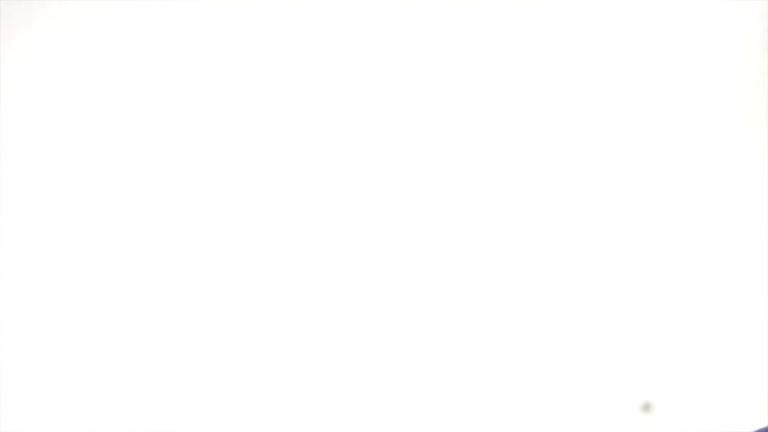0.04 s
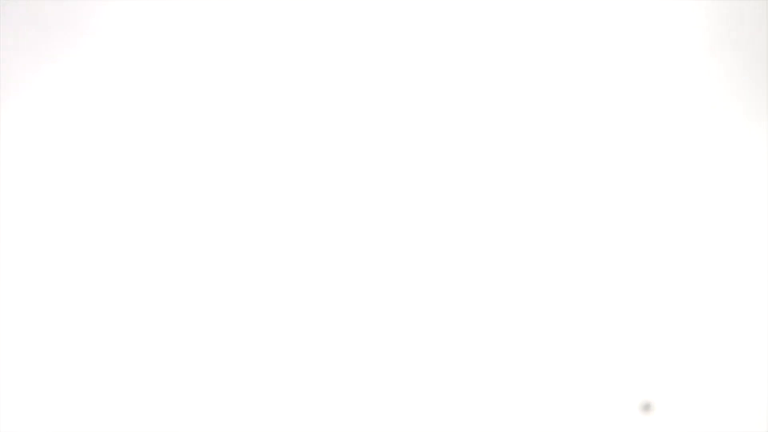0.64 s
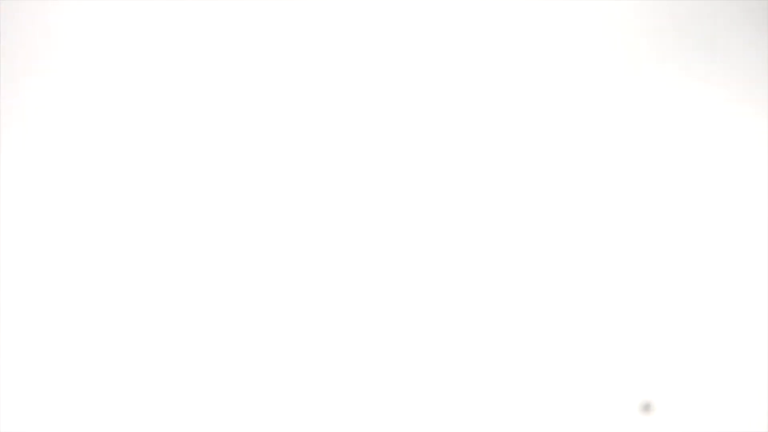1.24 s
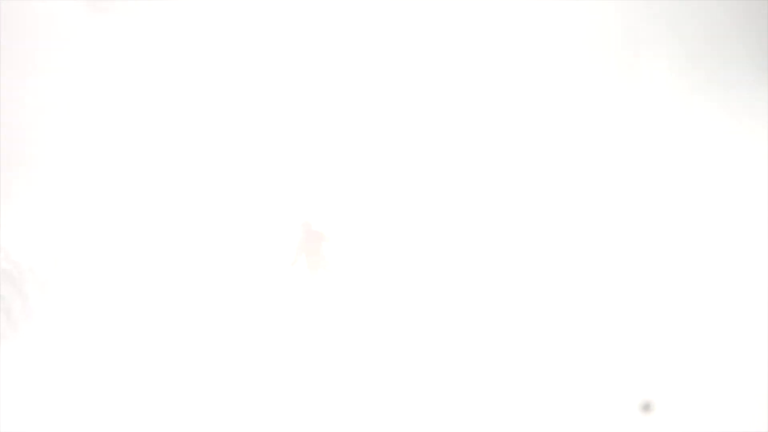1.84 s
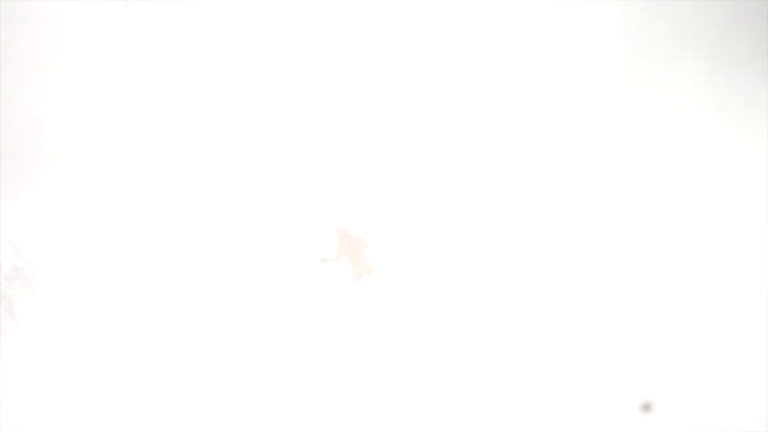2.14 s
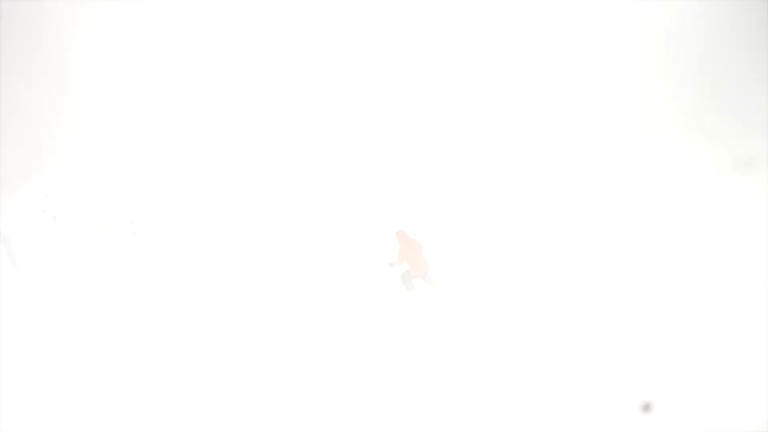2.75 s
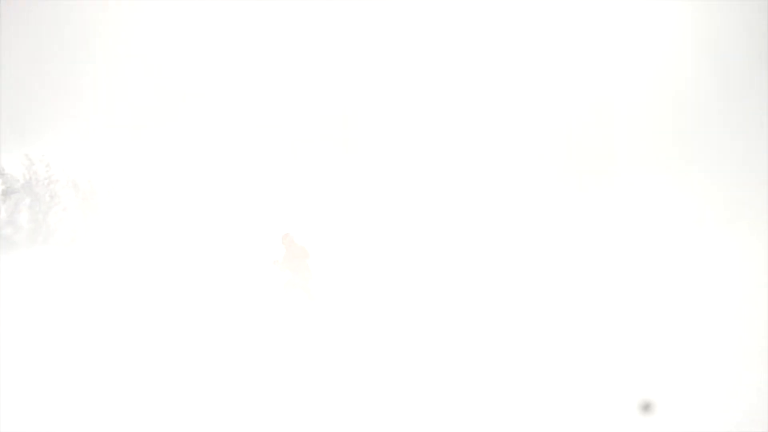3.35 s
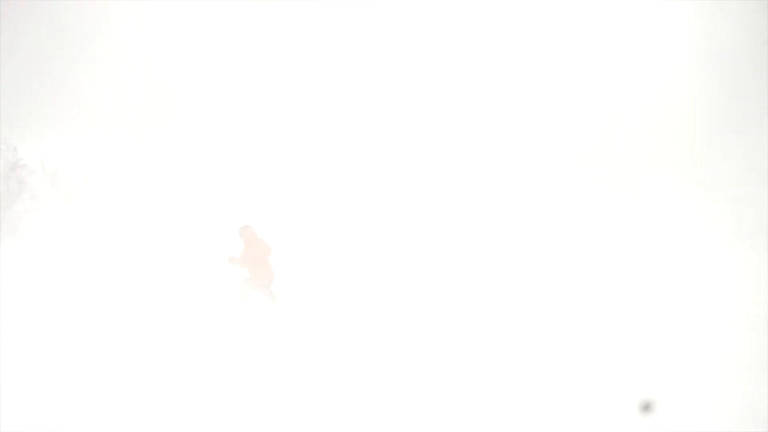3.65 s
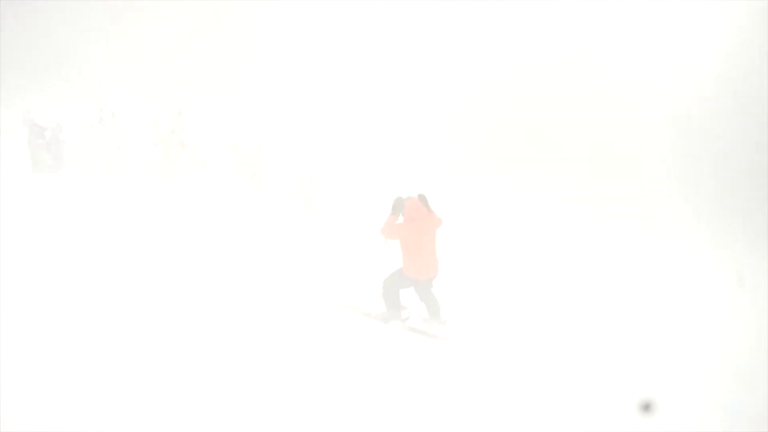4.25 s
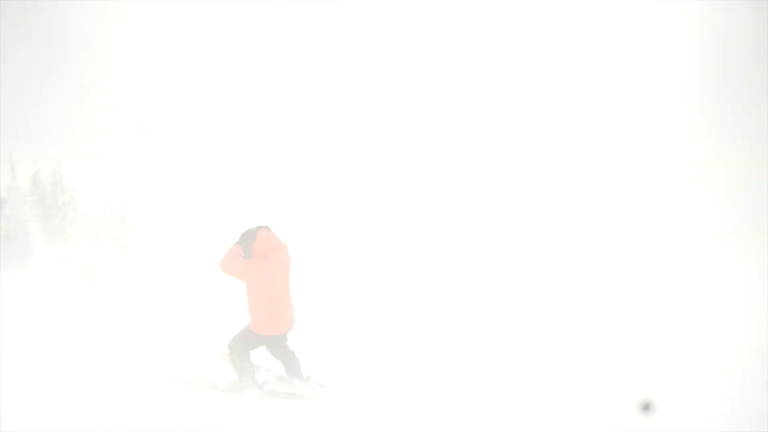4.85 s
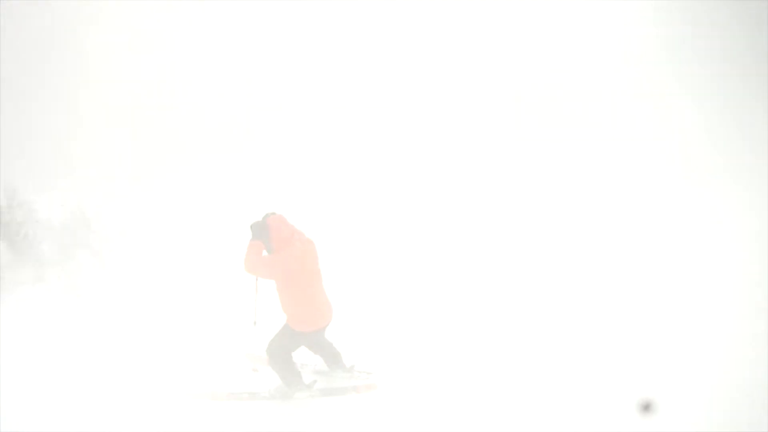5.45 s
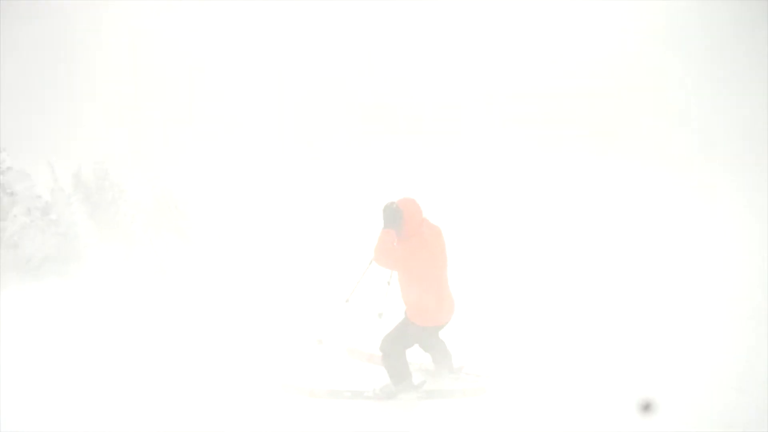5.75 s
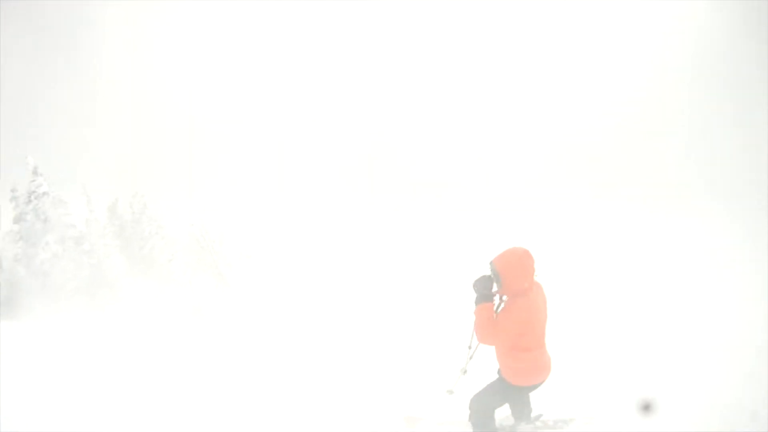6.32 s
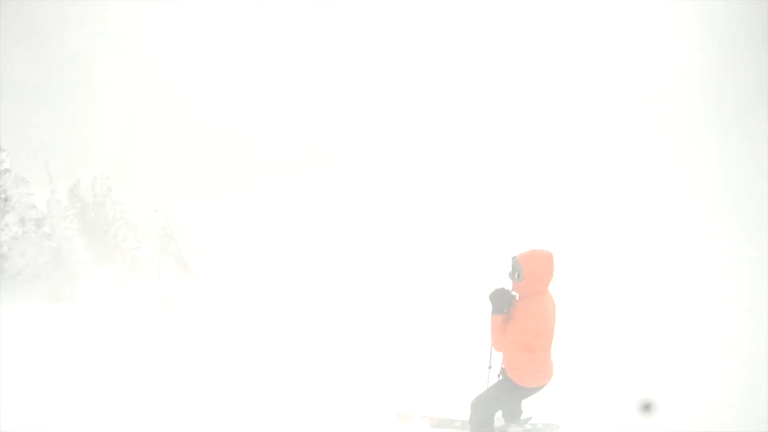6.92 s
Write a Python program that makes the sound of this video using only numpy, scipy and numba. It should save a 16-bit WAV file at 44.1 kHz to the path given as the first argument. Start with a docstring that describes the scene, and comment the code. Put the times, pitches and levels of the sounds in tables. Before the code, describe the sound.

Strong wind beats directly on the microphone of a small camera moving down an open snowy slope. A deep rumble and a hollow flutter run throughout, broken by irregular hard thumps. As gusts swell, the flutter rises in pitch and air rushes past, strongest near the middle, then easing briefly before more gusts arrive. Underneath, skis hiss very faintly on soft snow and a few grains tick against the housing.

```python
"""A snowy slope: strong wind beats on the microphone of a small moving camera.
Large eddies rumble, small ones flutter over the housing; as a gust swells, the flutter rises in pitch
and air rushes across the port, at times tearing into a rasp. Skis hiss faintly and snow grains tick.
Hard buffets crack and duck the gain control; coarse sampling adds a thin fizz high up."""
import sys
import numpy as np
from scipy import signal
from scipy.fft import rfft, irfft
from scipy.io import wavfile
from scipy.ndimage import uniform_filter1d
from numba import njit

SR = 44100
rng = np.random.default_rng(int(sys.argv[2]) if len(sys.argv) > 2 else 0)


def master(y):
    """Save y as 16-bit WAV."""
    cut = np.clip(np.atleast_2d(y).T, -1, 1)
    pcm = np.round(cut * 32767)  # scale
    wavfile.write(sys.argv[1], SR, pcm.astype(np.int16))


N = 316638

# airflow at the port, re usual flow: t/s, level/dB
AIRFLOW = [(0, -1.5), (.4, -4.5), (.56, -17.5), (.67, -1), (.85, -5), (1.19, 3.5), (1.26, -4.5),
           (1.76, -4.5), (1.88, -6.5), (2.01, 5), (2.19, -5.5), (2.85, 9.5), (2.96, 4.5), (3.08, 11),
           (3.22, 3.5), (3.45, 3), (3.87, -5), (4.0, 0.5), (4.25, -9.5), (4.38, -17), (4.5, -14.5),
           (4.68, -14), (5.07, 5), (5.22, 2), (5.34, 5.5), (5.48, 0), (5.6, -12), (5.74, -4), (5.93, -6.5),
           (6.03, -0.5), (6.42, -6), (6.67, 3), (7.05, -10.5), (7.18, 6.5)]
# large eddies: f/Hz, relative density/dB
RUMBLE_SPECTRUM = [(12, -16), (25, -3), (45, 2), (70, 2.5), (110, 0), (160, -8.5), (260, -22), (600, -46)]
# large eddies: t/s, level/dB
RUMBLE_DB = [(0.0, -19), (0.61, -17.5), (2.73, -22), (3.55, -16.5), (3.8, -22.5), (4.14, -18),
             (4.76, -19.5), (7.18, -17.5)]
# small eddies, before the band-pass: f/Hz, relative density/dB
FLUTTER_SPECTRUM = [(70, -4), (140, 4), (220, -1), (320, -2.5), (440, -3), (560, -6), (750, -12),
                    (1400, -34.5)]
# small eddies at usual flow: t/s, level/dB
FLUTTER_DB = [(0.0, -16.5), (0.84, -18.5), (1.48, -13.5), (2.52, -15.5), (2.63, -24), (3.78, -14),
              (3.99, -18), (4.5, -14.5), (4.95, -22.5), (5.13, -17.5), (5.58, -20), (7.18, -21.5)]
# eddy shedding rate of the housing: t/s, f/Hz
SHEDDING_HZ = [(0, 357), (.55, 277), (1.1, 376), (1.4, 204), (2.0, 223), (2.9, 435), (3.9, 278), (4.5, 180),
               (5.25, 423), (5.7, 256), (7.18, 287)]
# air crossing the port: f/Hz, relative density/dB
RUSH_SPECTRUM = [(200, -30), (480, -6.5), (800, 2), (1300, -4.5), (2000, -9), (2300, -13), (2750, -13.5),
                 (3200, -22), (3680, -17.5), (4100, -26), (5000, -34.5), (6000, -40)]
# snow, sliding or ticking: f/Hz, relative density/dB
SNOW_SPECTRUM = [(900, -17.5), (2500, 5), (4000, -0.5), (5000, -3.5), (6000, -13)]
# skis on soft snow: t/s, level/dB
SLIDE_DB = [(0, -48), (.7, -60), (2.2, -45.5), (4.3, -60), (5.5, -56), (6.3, -54), (7.18, -54.5)]
# single eddies hitting the port: t/s, peak level/dB, centre f/Hz
EDDY_HITS = [(0.164, 1, 88), (0.705, -4, 214), (0.744, -5.5, 156), (1.04, -7, 302), (1.206, 1.5, 210),
             (1.783, -2.7, 325), (2.578, -4, 139), (3.043, -12, 444), (3.272, -3, 258), (3.473, -1, 310),
             (4.297, -1.5, 94), (4.396, -2, 122), (4.559, -6, 107), (4.63, 2, 76), (4.704, -0.5, 79.4),
             (4.859, 4, 151), (5.113, -3.5, 228), (5.392, -5, 203), (5.535, -3, 104), (5.737, -5, 86),
             (6.2, -3.5, 106), (6.296, -1.5, 181), (6.384, -2.5, 94), (6.511, -5.8, 131),
             (6.723, -0.5, 112), (6.934, 2.5, 117)]
# snow grains hitting the housing: t/s, level/dB
GRAIN_HITS = [(0.5392, -41.5), (1.5668, -36), (4.4184, -57), (4.6284, -50), (4.7074, -34), (6.133, -44)]
# air tearing at the port: t/s, relative level/dB
FLOW_TEARS = [(0.606, -26), (0.79, -17.5), (1.469, -15), (1.513, -15), (1.708, -18.5), (1.863, -20),
              (4.605, -29), (5.844, -17.5), (6.131, -48)]


def undb(db):
    """Decibels to gain."""
    return 10 ** (np.asarray(db) / 20)


def curve(table):
    """(t/s, value) points at every sample."""
    s, value = np.transpose(table)
    return np.interp(np.arange(N) / SR, s, value)


def noise(spectrum, lo_hz, hi_hz):
    """Shaped noise, rms 1 within the given band."""
    f = np.maximum(np.arange(N // 2 + 1) * SR / N, 1)
    hz, db = np.transpose(spectrum)
    skirts = np.minimum(f / hz[0], 1) ** 2 * np.minimum(hz[-1] / f, 1) ** 2
    gain = undb(np.interp(np.log(f), np.log(hz), db)) * skirts
    power = np.mean(gain ** 2 * (f > lo_hz) * (f < hi_hz))
    return irfft(rfft(rng.standard_normal(N)) * gain, N) / np.sqrt(power)


def smooth(x, hz):
    """Average twice over 1 / hz seconds."""
    k = max(int(SR / hz), 1)
    return uniform_filter1d(uniform_filter1d(x, k), k)


def steady(x, hz):
    """Rms 1 over spans of 1 / hz seconds; faster swings stay."""
    return x / np.sqrt(smooth(x ** 2, hz) + 1e-12)


def flicker(rate_hz, depth_db):
    """Random gain, mean power 1."""
    walk = smooth(rng.standard_normal(N), rate_hz)
    gain = undb(depth_db * walk / walk.std())
    return gain / np.sqrt(np.mean(gain ** 2))


def strikes(events, decay_s):
    """Envelope: a jump and decay per (t/s, level/dB) event."""
    s, db = np.transpose(events)
    onsets = np.clip(s * SR, 0, N - 1).astype(int)
    jumps = np.bincount(onsets, undb(db), N)
    return signal.lfilter([1], [1, -np.exp(-1 / (decay_s * SR))], jumps)


@njit
def resonate(x, hz, width):
    """Moving band-pass; width is bandwidth / centre."""
    y, band, low = np.empty(len(x)), 0., 0.
    for i in range(len(x)):
        g = np.tan(np.pi * hz[i] / SR)
        v = (band + g * (x[i] - low)) / (1 + g * (g + width[i]))
        band, low = 2 * v - band, low + 2 * g * v
        y[i] = width[i] * v
    return y


@njit
def follow(x, attack, release):
    """Envelope of |x|; rates per sample."""
    out, level = np.empty(len(x)), 0.
    for i in range(len(x)):
        level += (abs(x[i]) - level) * (attack if abs(x[i]) > level else release)
        out[i] = level
    return out


def rumble():
    """Large eddies: slow pressure swings."""
    return steady(noise(RUMBLE_SPECTRUM, 20, 150), hz=6.6) * undb(curve(RUMBLE_DB))


def flutter(flow_db, bursts, db_per_flow_db=0.5, narrowing_per_db=0.0537):
    """Small eddies shed by the housing; narrower and more hollow as their base level rises."""
    base_db = curve(FLUTTER_DB)
    width = 2 ** (narrowing_per_db * (base_db.mean() - base_db))
    shed = resonate(noise(FLUTTER_SPECTRUM, 150, 560), curve(SHEDDING_HZ), width)
    return steady(shed * bursts, hz=5.3) * undb(base_db + db_per_flow_db * flow_db)


def rush(flow_db, bursts, eddies, level_db=-31, drag_db=1.4):
    """Air crossing the port, pulled faster by each moment of eddy suction."""
    suction = -2 * np.tanh(steady(eddies, hz=8) / 2)
    air = noise(RUSH_SPECTRUM, 800, 4000) * bursts * undb(drag_db * suction)
    air *= flicker(rate_hz=470, depth_db=0.9)
    return steady(air, hz=22.5) * undb(level_db + flow_db)


def snow(crack_offset_db=-40):
    """Skis hiss unevenly; grains hit the camera singly and with each buffet."""
    slide = undb(curve(SLIDE_DB)) * flicker(rate_hz=46, depth_db=2.5)
    cracks = [(s, db + crack_offset_db) for s, db, _ in EDDY_HITS]
    ticks = strikes(GRAIN_HITS + cracks, decay_s=0.0029)
    return (slide + ticks) * noise(SNOW_SPECTRUM, 800, 6000)


def surges_db(full_scale_db=4.5, rise_s=0.04):
    """Flow gathers ahead of each buffet and collapses as the eddy passes."""
    t = np.arange(N) / SR
    return sum(full_scale_db * undb(db) * np.exp(-np.abs(t - s) / rise_s) * (t < s)
               for s, db, _ in EDDY_HITS)


def buffets():
    """A passing eddy sucks at the port, then pushes."""
    t = np.arange(N) / SR
    pressure = np.zeros(N)
    for s, db, hz in EDDY_HITS:
        near = np.abs(t - s) < 2 / hz
        u = 2 * np.pi * hz * (t[near] - s) - 1
        pressure[near] += undb(db) * u * np.exp((1 - u ** 2) / 2)
    return pressure


def rasps(gain_db=-7):
    """The flow tears loose for a few milliseconds."""
    envelope = smooth(strikes(FLOW_TEARS, decay_s=0.0064), hz=503)
    return noise(RUSH_SPECTRUM, 800, 4000) * envelope * undb(gain_db)


def gain_control(x, threshold_db=-6, attack_s=0.00037, release_s=0.13):
    """Duck after a peak above threshold, then recover."""
    envelope = follow(x, 1 / (attack_s * SR), 1 / (release_s * SR))
    return x / np.maximum(envelope / undb(threshold_db), 1)


def sample_and_hold(x, rate_hz=12000):
    """Clip and hold coarse samples; the steps mirror the spectrum around the sampling rate."""
    coarse = signal.resample_poly(x, rate_hz, SR, window=("kaiser", 8))
    steps = np.repeat(np.clip(coarse, -1, 1), 4)
    return signal.resample_poly(steps, SR, 4 * rate_hz)[:N]


def scene():
    """Wind and snow, mono. Flutter and rush share flow and bursts; buffets flare the rush."""
    flow_db = curve(AIRFLOW) + surges_db()
    bursts = flicker(rate_hz=51, depth_db=1.5)
    eddies = rumble() + flutter(flow_db, bursts)
    pressure = buffets()
    flare = 1 + 0.97 * np.abs(pressure)
    air = rush(flow_db, bursts, eddies) * flare
    return (eddies + air + snow() + pressure + rasps())[None]


def record(dry, cutoff_hz=15400):
    """Camera: gain control, coarse sampling, low-pass."""
    held = sample_and_hold(gain_control(dry[0]))
    lowpass = signal.ellip(10, .2, 80, cutoff_hz, fs=SR, output="sos")
    return signal.sosfilt(lowpass, held)[None]


dry = scene()
out = record(dry)
master(out)
```